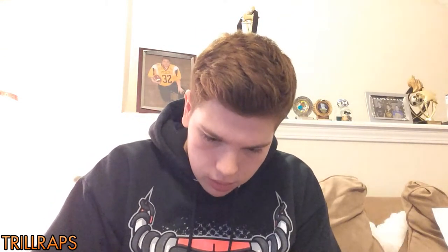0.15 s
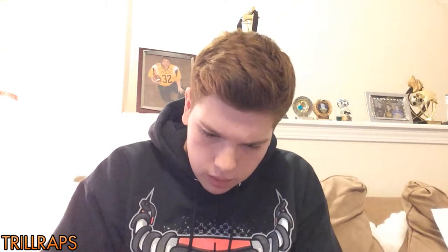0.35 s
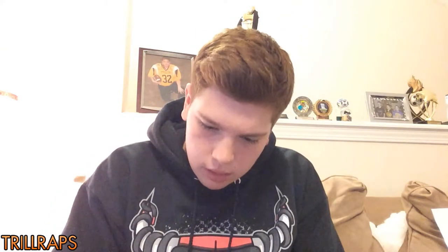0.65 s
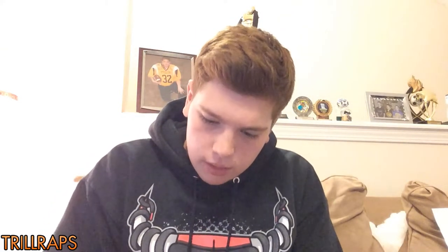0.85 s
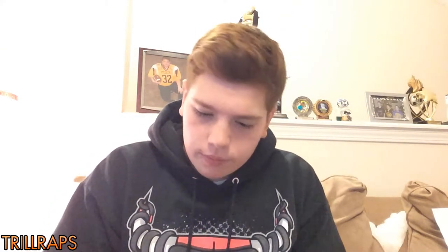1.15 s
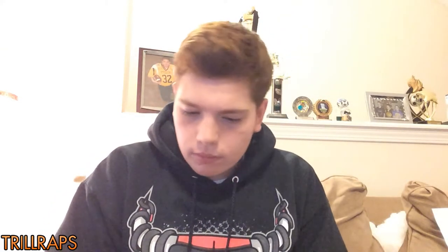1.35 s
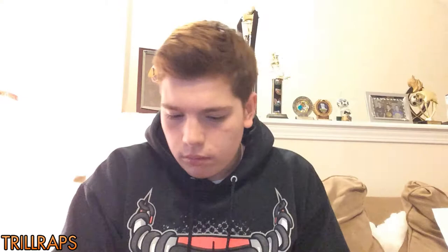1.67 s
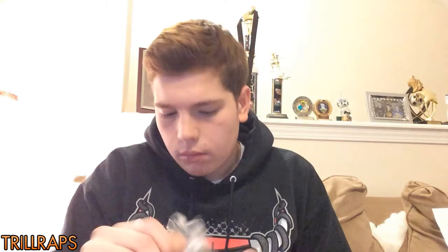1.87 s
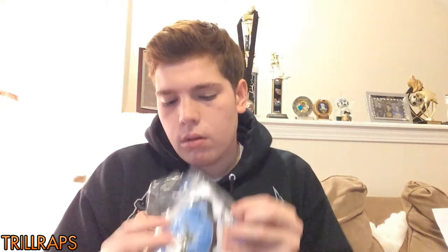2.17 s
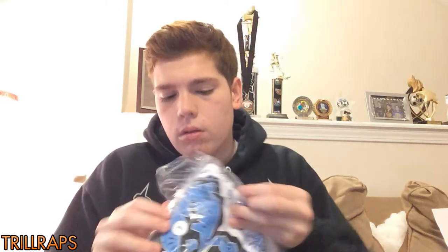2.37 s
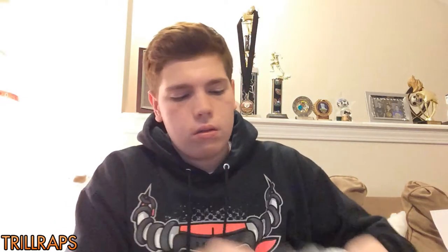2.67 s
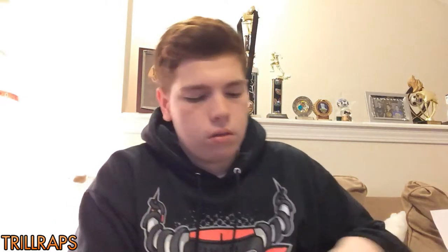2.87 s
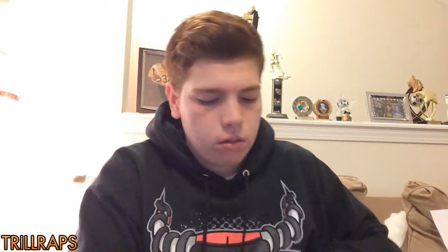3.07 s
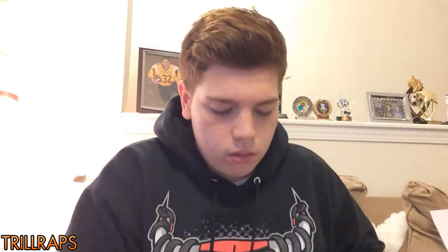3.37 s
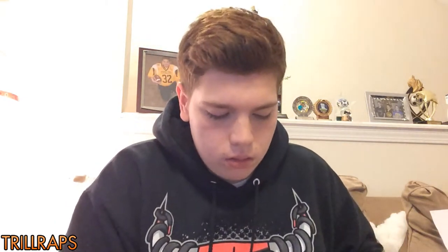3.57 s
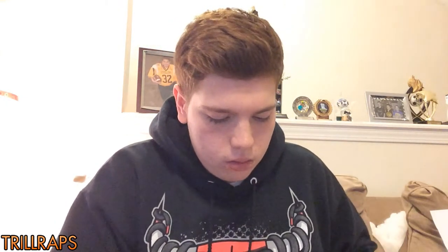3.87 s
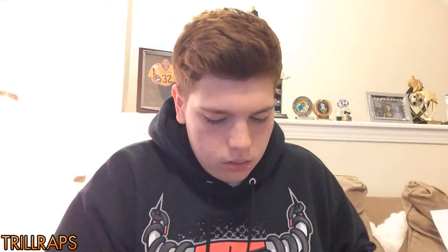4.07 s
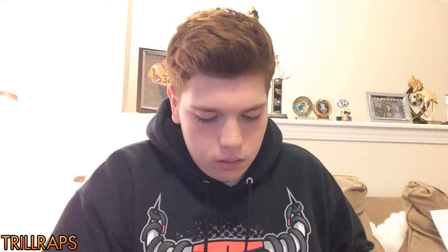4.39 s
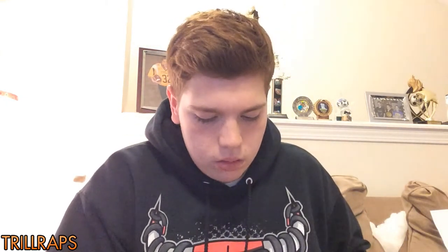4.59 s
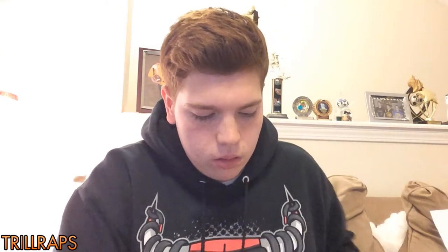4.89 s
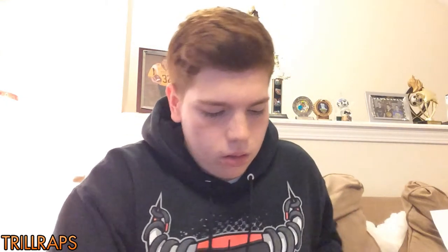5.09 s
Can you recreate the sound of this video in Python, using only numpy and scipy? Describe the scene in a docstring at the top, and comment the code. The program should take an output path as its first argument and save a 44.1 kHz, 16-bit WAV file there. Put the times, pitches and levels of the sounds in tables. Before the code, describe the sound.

Close hands pull at plastic packaging, with sharp crackles, three short rips and soft rustling in between.

```python
"""Tearing open a plastic bag

A living room, a small microphone close to the hands as they pull, tear and crumple the bag.
The stiff film buckles in sharp snaps over a rustle of tiny creases; the seam tears in jerks.
Each buckle sounds three ways: the crease cracks, the film beside it flexes, the slack panel pops.
Faint mains hum and hiss lie below."""
import sys
import numpy as np
from scipy import signal
from scipy.fft import rfft, irfft
from scipy.io import wavfile
from scipy.ndimage import uniform_filter1d

SR = 44100
rng = np.random.default_rng(int(sys.argv[2]) if len(sys.argv) > 2 else 0)


def generate_wav(sig):
    """Save sig (samples, or channels by samples) to the path in sys.argv[1] as 16-bit PCM at SR."""
    pcm = np.round(np.clip(np.atleast_2d(sig).T, -1, 1) * 32767).astype(np.int16)
    wavfile.write(sys.argv[1], SR, pcm)


N = 230942
LEAD_S = .001  # a crease strains this long before it flips
POCKET_HZ, POCKET_T60_S = 339, 0.013  # air pocket of the open bag

# Buckles that move the film around them: time_s, crack_db, flex_db, panel_db
# (in all tables, flex_db and panel_db are relative to the crack)
FILM_SNAPS = [(0.0915, -40.5, 4, -9), (1.1443, -30.5, 6, -1), (1.22, -33, 4, -2), (1.708, -23, 1, -11),
              (1.7327, -19, -15, -11), (1.7391, -21.5, -10, -10), (1.7523, -19, 0, -10),
              (1.759, -16.5, -12.5, -8.5), (1.7849, -18, 0, -3.5), (1.7947, -17.5, -14, -7.5),
              (1.8124, -17, -6.5, -7), (1.8436, -16, -9, -8.5), (1.9181, -22.5, 0.5, -11),
              (2.2267, -40.5, -2, 9.5), (2.239, -30.5, -5, -11), (2.5974, -35.5, 0, -4),
              (3.0740, -21, -2, -4.5), (3.6642, -18, -6, -19), (3.6969, -16.5, -0.5, -15),
              (3.7915, -25, 10, 5), (3.9956, -41, 8, -12), (4.1788, -26.5, 0, -2.5), (4.6396, -30.5, 4, 2),
              (4.814, -41, 13.5, 11.5)]
# Lone creases that only tick or crack: time_s, crack_db
LONE_CRACKS = [(0.029, -38.5), (0.079, -44), (0.1641, -40.5), (0.295, -44.5), (0.3293, -43.5),
               (0.4367, -26), (0.4758, -22), (0.512, -18.5), (0.5821, -35), (0.5906, -24.5), (0.5966, -27),
               (0.606, -25), (0.6323, -34), (0.6566, -31), (0.7248, -36), (0.7716, -26.5), (0.863, -30),
               (0.909, -28), (1.055, -37.5), (1.4723, -31.5), (1.559, -27), (1.5766, -32), (1.6005, -21.5),
               (1.606, -26), (1.6183, -21.5), (1.6258, -18.5), (1.6311, -22.5), (1.6353, -28),
               (1.6376, -26), (1.6451, -19), (1.6499, -20), (1.6535, -22), (1.659, -21), (1.6624, -20.5),
               (1.6703, -22.5), (1.6759, -18), (1.68, -24), (1.6908, -23), (1.7004, -19.5), (1.7163, -21.5),
               (1.7217, -20.5), (1.7644, -20), (1.9668, -33.5), (2.0766, -32.5), (2.1054, -31.5),
               (2.145, -36.5), (2.4584, -38), (2.531, -35.5), (2.6199, -32), (2.802, -31.5),
               (2.8058, -32.5), (2.8122, -32.5), (2.8185, -28), (2.8319, -28), (2.8371, -25.5),
               (2.8744, -28), (2.889, -39), (2.92, -27), (2.9476, -27), (2.9627, -26), (2.976, -24.5),
               (2.9849, -24.5), (2.9886, -26), (2.9958, -33), (3.6364, -39.5), (3.6688, -21.5),
               (4.0275, -36.5), (4.0337, -37.5), (4.1441, -38), (4.1628, -37), (4.3203, -39)]


def snaps(flex_db=-7.5, panel_db=-29):
    """Stiff film gives way close to the microphone, in full snaps and thin, lone cracks."""
    cracks = [(s, crack_db, flex_db, panel_db) for s, crack_db in LONE_CRACKS]
    return single_buckles(list(FILM_SNAPS) + cracks)


# Jerks of the seam, in three runs: time_s, crack_db
SEAM_JERKS = [(0.7809, -19.5), (0.7831, -14.5), (0.7874, -17), (0.789, -18.5), (0.7911, -21.5),
              (0.7964, -14.5), (0.7990, -18.5), (0.8021, -21), (0.8064, -15.5), (0.8100, -15.5),
              (0.8128, -25.5), (0.8165, -14.5), (0.8219, -24.5), (0.8241, -18), (0.8285, -13),
              (0.831, -21.5), (0.839, -16), (3.1231, -21), (3.1356, -19), (3.1462, -17), (3.153, -24.5),
              (3.1643, -18), (3.1727, -17), (3.1823, -20), (3.706, -27.5), (3.7147, -24), (3.719, -24),
              (3.7277, -21.5), (3.737, -24.5), (3.7494, -23.5), (3.7575, -26)]


def tearing_seam(flex_db=1, shut_panel_db=-17, gape_boost_db=19):
    """The seam gives way jerk by jerk; the wider the bag gapes, the louder its panel pops."""
    return single_buckles([(s, crack_db, flex_db, shut_panel_db + gape_boost_db * gape_at(s))
                           for s, crack_db in SEAM_JERKS])


def single_buckles(rows, snap_s=0.0023, spread_octaves=0.15):
    """Each buckle drives the film, whose tension and air pocket shift at random from snap to snap."""
    out = np.zeros(N + SR)
    for s, crack_db, flex_db, panel_db in rows:
        push = buckle(shiver_db=-1, shiver_s=0.00099, strain_s=0.0002, ring_db=-3)
        pocket_hz = POCKET_HZ * 2 ** (spread_octaves * rng.standard_normal())
        tension = 2 ** (spread_octaves * rng.standard_normal())
        crack, flex, panel = map(unit_energy, film(push, gape_at(s), pocket_hz, tension))
        snap = from_db(1) * crack - from_db(flex_db - 3.5) * flex + from_db(panel_db - 2) * panel
        at = round((s - LEAD_S) * SR)
        out[at:at + len(snap)] += from_db(crack_db) * np.sqrt(snap_s * SR) * snap
    return out[:N]


def buckle(shiver_db, shiver_s, strain_s, ring_db, settle_db=-9, settle_s=.0022, size=2048):
    """A crease strains, flips sharply and settles more weakly, as waves scatter across the wrinkles."""
    t = (np.arange(size) - round(LEAD_S * SR)) / SR
    swell = np.exp(np.minimum(t / strain_s, -t / shiver_s))
    shiver = unit_energy(rng.standard_normal(size) * swell)
    settle_at = int((LEAD_S + rng.uniform(.1, 1) * settle_s) * SR)
    settle = from_db(settle_db) * (np.arange(size) == settle_at)
    push = from_db(shiver_db) * shiver + rng.choice([-1, 1]) * ((t == 0) - settle)
    # each crease rings for a few cycles at a pitch set by its length
    pitch_hz = 1600 * 7 ** rng.random()
    return unit_energy(push + from_db(ring_db) * ring(push, pitch_hz, 6 / pitch_hz))


# Resonances of the flexing film: pitch_hz, t60_s
FILM_MODES = [(1280, 0.0031), (1900, 0.0057)]


def film(push, gape, pocket_hz, tension=1, body_db=-2):
    """The film's three voices: bright crack, papery flex, and a panel pop, hollow as the bag gapes."""
    crack = band(band(push, 1900, 23800, order=1), 1900, 14940)
    modes = sum(ring(push, hz * tension, t60_s) for hz, t60_s in FILM_MODES)
    flex = band(from_db(body_db) * push + modes, 462, 3085, order=3)
    taut = unit_energy(band(band(push, 210, 1050, order=1), 90, 900))
    hollow = unit_energy(band(ring(push, pocket_hz, POCKET_T60_S), 160, 506))
    panel = ((1 - gape) * taut + gape * hollow) * np.sqrt(len(push))
    return crack, flex, panel


# Whole panels flipping over: start_s, level_db, pitch_hz, loss_db_per_cycle (sign ignored)
PANEL_FLIPS = [(0.091, -30.5, 645, 7.5), (0.682, -25.5, 547, 8.5), (0.7853, -4, 1386, 5),
               (1.145, -29, 244, 18), (1.219, -21, 1840, -4.5), (1.9199, -12.5, 1700, 4.5),
               (2.035, -30, 376, 4.5), (2.235, -20.5, 424, 7), (4.637, -17.5, 487, 7),
               (4.814, -19.5, 245, 12)]


def panel_flips(rise_cycles=0.48):
    """A panel flips with a dry knock of a few cycles, ringing higher and longer when taut."""
    out = np.zeros(N + SR)
    t = np.arange(SR // 10) / SR
    for start_s, level_db, pitch_hz, loss_db in PANEL_FLIPS:
        cycles = pitch_hz * t
        envelope = from_db(level_db - abs(loss_db) * cycles) * (1 - np.exp(-cycles / rise_cycles))
        at = round(start_s * SR)
        out[at:at + len(t)] += envelope * np.sin(2 * np.pi * cycles)
    return out[:N]


# How the bag is held: time_s, gape_fraction, slide_db (sliding hiss relative to the creases)
BAG_GRIP = [(0.15, 0.05, -3), (0.45, 0.37, -9.5), (2.2, 0.32, -8), (3.1, 0.97, 1.5), (3.7, 0.9, -4.5),
            (3.76, 0.76, 4.5), (4.15, 0.35, -11), (4.45, 0, 1.5)]


def rustle(gentle_per_s=185, doubling_db=16, colour_db=3.5, colour_per_s=90):
    """The harder the hands work, the louder and denser the creases come."""
    strength = hand_effort()
    level_db = 20 * np.log10(strength[0])
    gape, slide_db = in_time(BAG_GRIP)
    per_s = gentle_per_s * 2 ** ((level_db - np.median(level_db)) / doubling_db)
    voices = film(creases(per_s, slide_db), np.clip(gape, 0, 1), POCKET_HZ)
    # the balance of crack, flex and panel wanders at random, so the colour shifts from moment to moment
    voices = [voice * from_db(colour_db * drift(colour_per_s)) for voice in voices]
    # the hands feed in their work steadily, however it is split among the creases
    steady = [voice / np.sqrt(uniform_filter1d(voice ** 2, size=1300) + 1e-12) for voice in voices]
    crack, flex, panel = strength * np.array(steady)
    return from_db(0.18) * crack - from_db(1.15) * flex + from_db(-2) * panel


def creases(per_s, slide_db, spread_db=3.5, count=240, size=256):
    """Tiny buckles of uneven size and colour at random moments, over the hiss of film sliding on film."""
    sizes = from_db(spread_db * np.minimum(rng.exponential(1, N), 2.7))
    chance = per_s / SR
    clicks = sizes * (rng.random(N) < chance) / np.sqrt(chance * np.mean(sizes ** 2))
    shapes = [buckle(shiver_db=-2.1, shiver_s=0.00057, strain_s=0.000042, ring_db=5, size=size)
              for _ in range(count)]
    shape_index = rng.integers(0, count, N)
    grains = np.zeros(N + size)
    for at in np.flatnonzero(clicks):
        grains[at:at + size] += clicks[at] * shapes[shape_index[at]]
    return grains[:N] + from_db(slide_db) * rng.standard_normal(N)


# One pull, tear or squeeze each: start_s, length_s, crack_db, swell_db, flex_db, panel_db
HAND_STROKES = [(0.436, 0.083, -42, 4, -12.5, -12), (0.59, 0.059, -35, -11, -13, -19.5),
                (0.782, 0.055, -28.5, -7, 6, -13.5), (0.949, 0.054, -46, 0, -18, -10.5),
                (1.26, 0.024, -46, 0, -3.5, -27), (1.357, 0.08, -52, 6.5, -5, -15),
                (1.463, 0.066, -42.5, -1, -5.5, -11.5), (1.552, 0.05, -36, 5.5, -5, -18.5),
                (1.62, 0.082, -34.5, 2.5, -2, -12.5), (1.714, .052, -34.5, -4, 5.5, -8),
                (1.97, 0.079, -45, 0.5, -7.5, -3), (2.087, 0.088, -44.5, 0.5, -1, -6.5),
                (2.219, 0.013, -40, 1.5, -3.5, -7), (2.442, 0.041, -45, 8.5, -7, -14),
                (2.816, 0.072, -37, 0.5, -6, -11.5), (2.954, 0.051, -33.5, 6.5, -11, -15),
                (3.053, 0.023, -48, -1.5, 8, -6), (3.088, 0.0045, -28.5, -3.5, -11, -12.5),
                (3.142, 0.039, -29, 1, -2.5, -5.5), (3.318, 0.039, -51.5, 9, -3, -7),
                (3.677, 0.014, -34.5, -8, -11.5, -14), (3.704, 0.092, -26.5, -3.5, -2.5, -7),
                (4.321, 0.037, -44.5, 2.5, -4.5, -21), (4.412, 0.097, -47.5, 5, -1.5, -4),
                (4.626, 0.013, -38, -6, -3, -12), (5.001, 0.013, -54, -4.5, 2, -1),
                (5.175, 0.033, -45.5, -5, -10.5, -14)]
# Light fingering of the film between strokes: time_s, crack_db
LIGHT_FINGERING = [(0, -61.5), (.05, -59.5), (.17, -56), (.22, -60.5), (.4, -60), (1.2, -60.5), (2.1, -53),
                   (2.785, -57), (2.83, -53), (3.39, -58), (3.43, -74), (3.55, -60.5), (3.93, -61.5),
                   (4.4, -59.5), (4.82, -59.5), (4.92, -79), (5.24, -74)]


def hand_effort(fidget_db=3, fidget_per_s=55, flurry_db=-24.5):
    """Strength of crack, flex and panel over time: fingering, strokes and flurries add their power."""
    t = np.arange(N) / SR
    fingering_db, = in_time(LIGHT_FINGERING)
    fingering = from_db(fingering_db + fidget_db * drift(fidget_per_s))
    parts = [(fingering, 0, -6)]  # crack gain, flex_db, panel_db
    for start_s, length_s, crack_db, swell_db, flex_db, panel_db in HAND_STROKES:
        progress = np.clip((t - start_s) / length_s, 0, 1)
        level = from_db(crack_db + swell_db * (progress - .5))
        stroke = gesture(start_s, length_s, attack_s=0.0028, release_s=0.019)
        parts.append((level * stroke, flex_db, panel_db))
    # a flurry of small creases gives way around every full snap
    for s, crack_db, flex_db, panel_db in FILM_SNAPS:
        flurry = gesture(s, 0, attack_s=0.01, release_s=0.018)
        parts.append((from_db(crack_db + flurry_db) * flurry, flex_db, panel_db))
    shares = from_db([(0, flex_db, panel_db) for _, flex_db, panel_db in parts]) ** 2
    powers = np.array([gain ** 2 for gain, _, _ in parts])
    return np.sqrt(shares.T @ powers)


# The living room's tail, heard from beside the bag: frequency_hz, level_db, t60_s
ROOM_TAIL = [(121, -3.5, 0.12), (315, -12, 0.22), (800, -12.5, 0.22), (4030, -11.5, 0.22),
             (15000, -17, 0.19)]


def living_room(x, echo_s=0.011, echo_db=-16, echo_spread_s=0.0015, build_s=0.00053):
    """Direct sound, a scattered echo off the nearest surfaces and a short tail that dies band by band."""
    t = np.arange(SR // 2) / SR
    edges_hz = np.geomspace(70, 18000, 10)
    response = np.zeros(len(t))
    for low, high in zip(edges_hz, edges_hz[1:]):
        hz = np.sqrt(low * high)
        fade = from_db(-60 * t / at_hz(ROOM_TAIL, hz, column=2)) * (1 - np.exp(-t / build_s))
        tail = unit_energy(band(rng.standard_normal(len(t)), low, high) * fade)
        response += from_db(at_hz(ROOM_TAIL, hz)) * np.sqrt(2 * (high - low) / SR) * tail
    echo = rng.standard_normal(len(t)) * (t > echo_s) * np.exp(-np.abs(t - echo_s) / echo_spread_s)
    response += from_db(echo_db) * unit_energy(echo)
    return x + signal.oaconvolve(x, response)[:N]


# Spectrum of the noise floor: frequency_hz, relative_db
NOISE_FLOOR = [(18, -47), (30, -9), (144, -3), (420, -11), (518, -17), (3070, -24), (4090, -33),
               (7650, -34), (15500, -33)]
# Mains hum in the room: pitch_hz, rms_db
MAINS_HUM = [(59.5, -68.5), (119, -66)]


def room_tone(noise_rms_db=-58):
    """Low room rumble, microphone hiss and mains hum."""
    hz = np.arange(N // 2 + 1) * SR / N
    spectrum = rfft(rng.standard_normal(N)) * from_db(at_hz(NOISE_FLOOR, hz))
    noise = unit_energy(irfft(spectrum, N)) * np.sqrt(N)
    t = np.arange(N) / SR
    hum = sum(np.sqrt(2) * from_db(rms_db) * np.sin(2 * np.pi * (pitch_hz * t + rng.random()))
              for pitch_hz, rms_db in MAINS_HUM)
    return from_db(noise_rms_db) * noise + hum


def gape_at(s):
    """How far the bag gapes at a moment, 0-1."""
    grip_s, gape, _ = np.transpose(BAG_GRIP)
    return np.clip(np.interp(s, grip_s, gape), 0, 1)


def gesture(start_s, length_s, attack_s, release_s):
    """Rise, hold and die away; attack and release are times to 1/e."""
    age = np.arange(N) / SR - start_s
    return np.exp(np.clip(np.minimum(age / attack_s, (length_s - age) / release_s), -20, 0))


def ring(x, hz, t60_s):
    """A damped resonance."""
    r, w = from_db(-60 / (t60_s * SR)), 2 * np.pi * hz / SR
    return signal.lfilter([(1 - r * r) / 2, 0, (r * r - 1) / 2], [1, -2 * r * np.cos(w), r * r], x + 1e-18)


def band(x, low_hz, high_hz, order=2):
    """Causal band-pass."""
    top_hz = min(high_hz, .48 * SR)
    sos = signal.butter(order, [min(low_hz, top_hz / 2), top_hz], "band", fs=SR, output="sos")
    return signal.sosfilt(sos, x + 1e-18)


def drift(per_s):
    """A random wander with a spread of one."""
    knots = rng.standard_normal(int(N / SR * per_s) + 2)
    wander = np.interp(np.arange(N) / SR * per_s, np.arange(len(knots)), knots)
    return wander / wander.std()


def in_time(rows):
    """Columns of a timed table, sample by sample."""
    s, *columns = np.transpose(rows)
    return [np.interp(np.arange(N) / SR, s, column) for column in columns]


def at_hz(rows, hz, column=1):
    """Read a column of a table on a log-frequency axis."""
    rows = np.array(rows)
    return np.interp(np.log(np.maximum(hz, 1)), np.log(rows[:, 0]), rows[:, column])


def from_db(db):
    """Decibels to gain."""
    return 10 ** (np.asarray(db) / 20)


def unit_energy(x):
    """Scale so that the squares sum to one."""
    return x / np.sqrt(np.sum(x ** 2) + 1e-20)


def scene():
    """The bag close up in the living room, over the room tone, in mono."""
    bag = snaps() + tearing_seam() + panel_flips() + rustle()
    return (living_room(bag) + room_tone())[None]


# Response of the small microphone: frequency_hz, gain_db
MIC_RESPONSE = [(1000, 0), (2000, -4.5), (4000, 0), (7800, 1.5), (8400, -3), (15000, -2)]


def record(dry, cutoff_hz=15600):
    """The microphone colours the sound, the tallest peaks are rounded and the top is cut."""
    hz = np.linspace(0, SR / 2, num=257)
    colour = signal.firwin2(129, hz, from_db(at_hz(MIC_RESPONSE, hz)), fs=SR)
    rounded = np.tanh(signal.oaconvolve(dry, colour[None], mode="same"))
    low_pass = signal.firwin(201, cutoff_hz, fs=SR)
    return signal.oaconvolve(rounded, low_pass[None], mode="same")


dry = scene()
out = record(dry)
generate_wav(out)
```